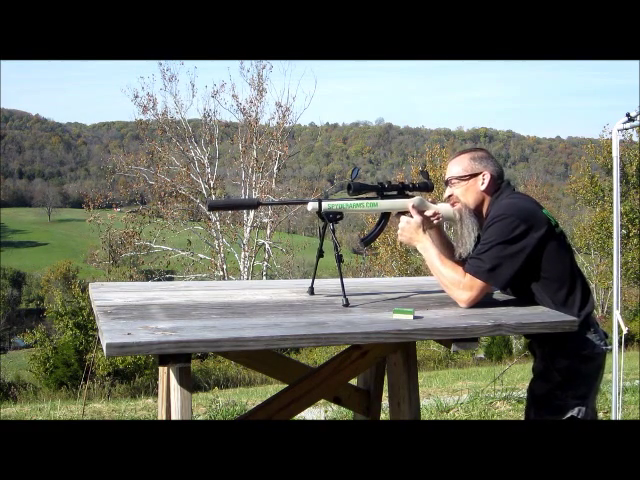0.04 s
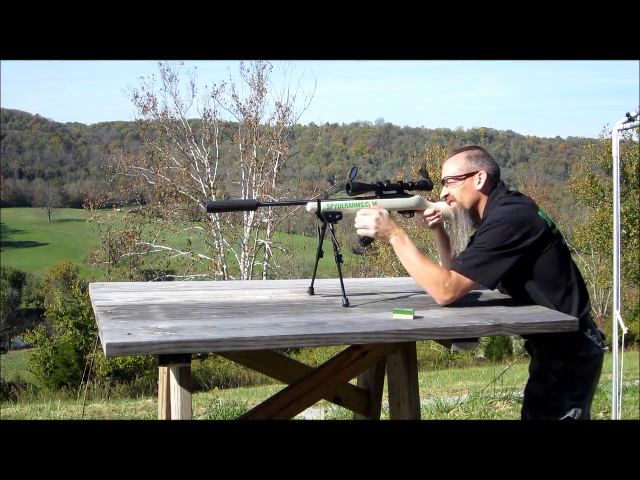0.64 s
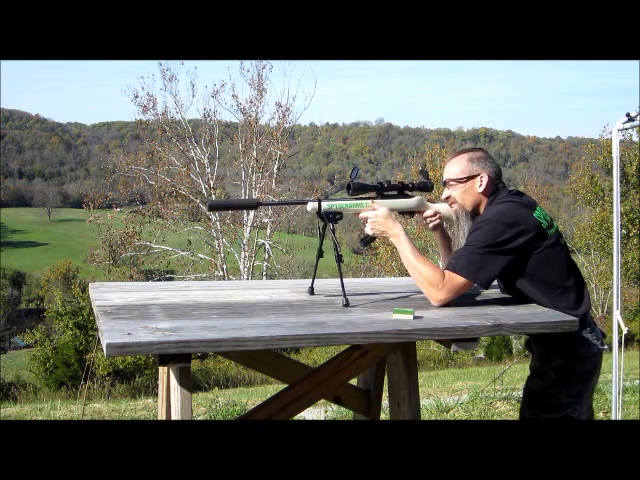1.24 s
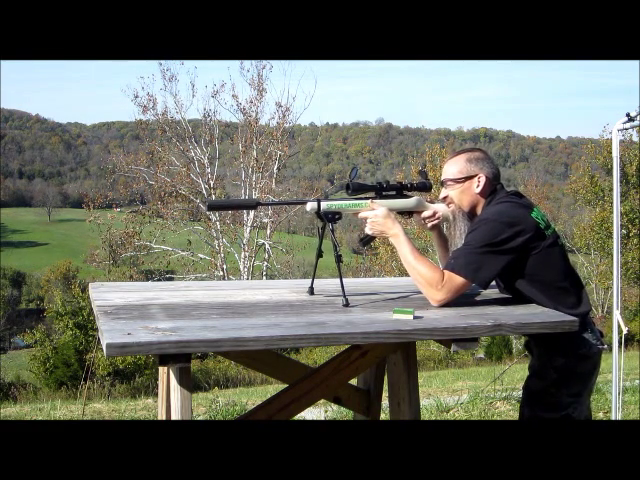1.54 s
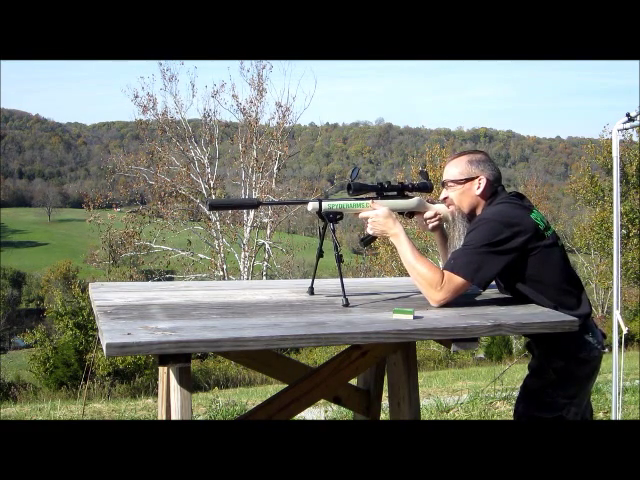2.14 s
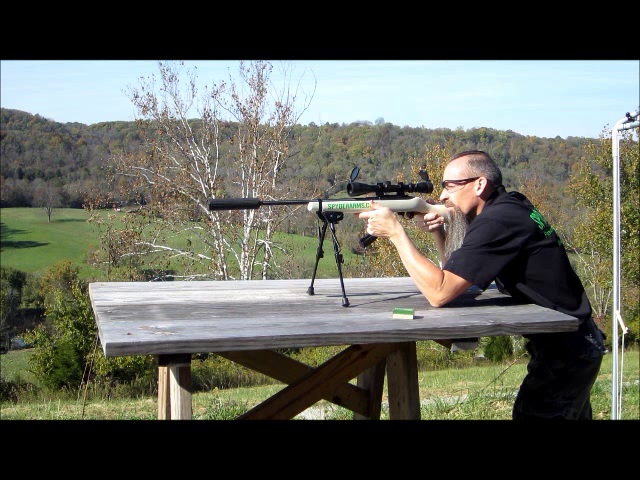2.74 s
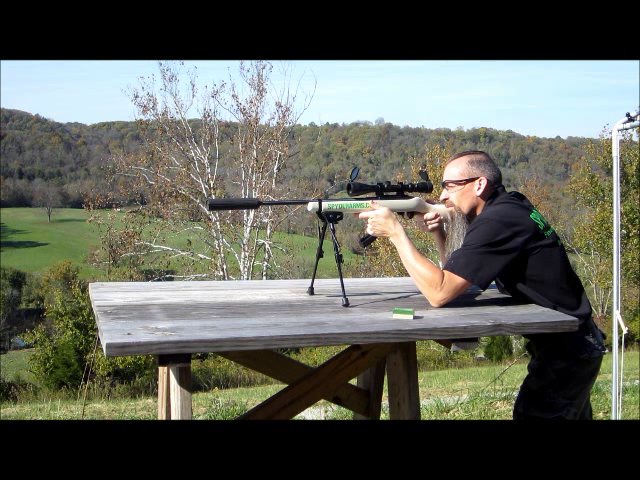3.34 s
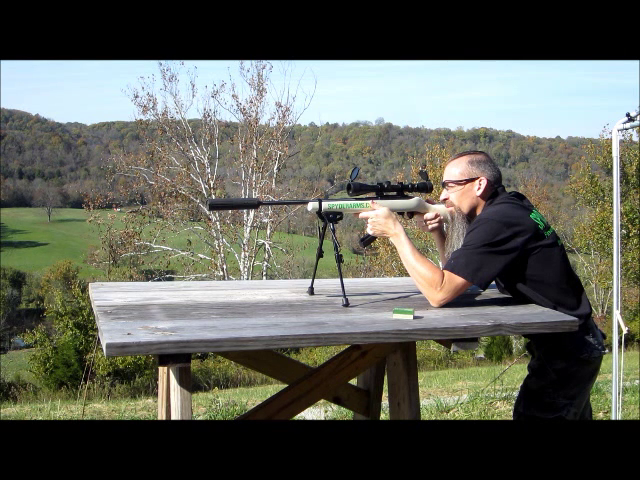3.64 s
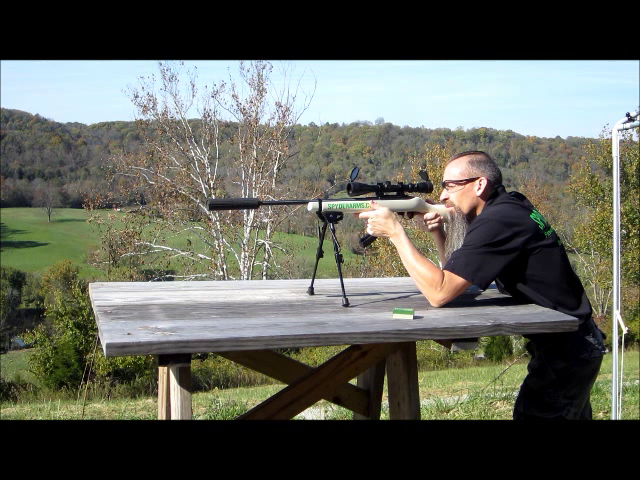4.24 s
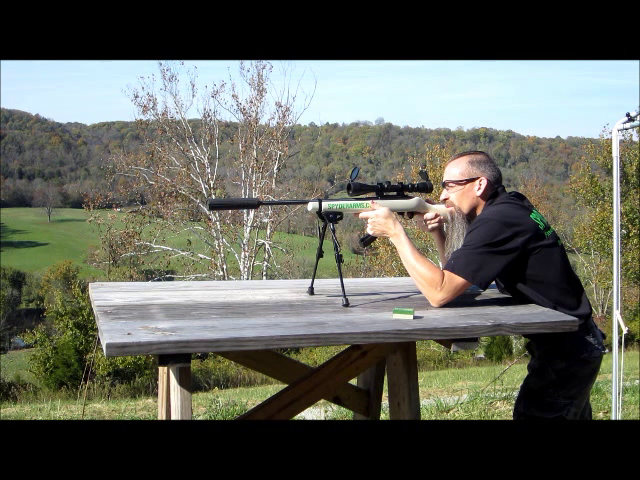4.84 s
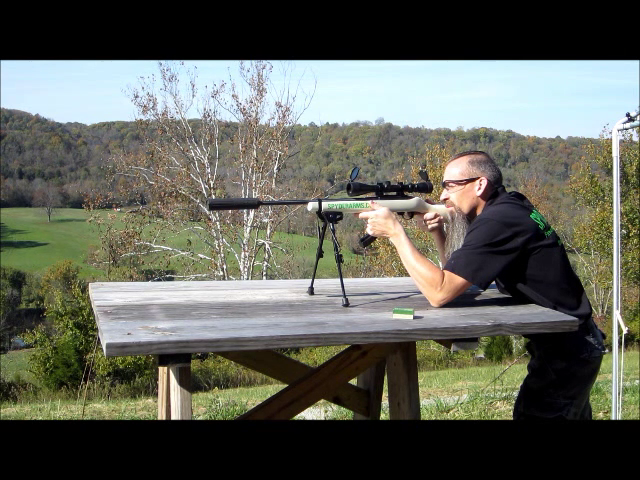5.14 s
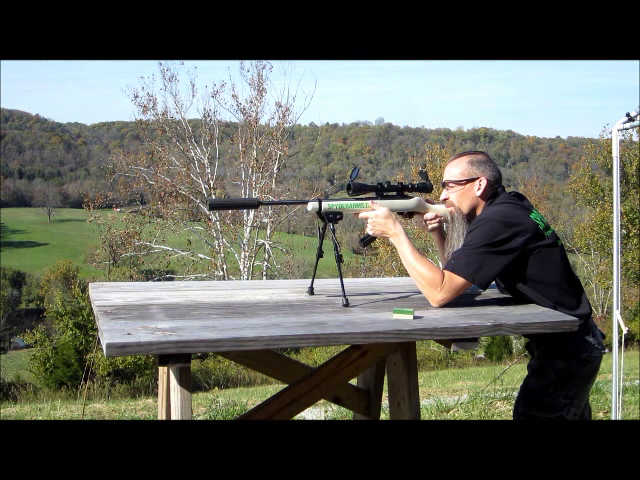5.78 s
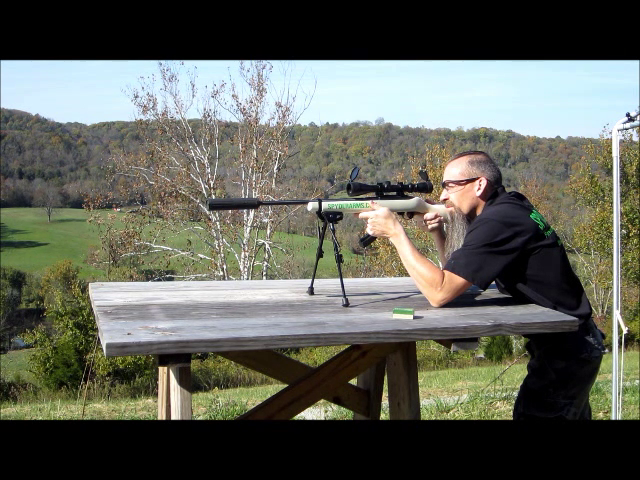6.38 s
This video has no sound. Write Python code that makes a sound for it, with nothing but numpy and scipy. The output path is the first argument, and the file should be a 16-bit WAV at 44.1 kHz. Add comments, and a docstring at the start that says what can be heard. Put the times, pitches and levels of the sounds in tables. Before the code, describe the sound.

In quiet open countryside, soft moving air and a faint distant engine hum lie under a small bird's high trill, short chirping calls and some farther whistles. After about five seconds a suppressed rifle fires once, close by: a sharp spit with a metallic bolt clack. Trees and hills echo it, the spent case tinkles, and a steel target pings faintly. The background dips after the shot, and the bird calls again.

```python
"""One shot from a suppressed semi-automatic .22 rifle on a wooden table, above a wooded valley.
First, over moving air, a distant engine and a camera's faint whine, a small bird trills and calls
while others whistle farther off. At 5.13 s the hammer falls, the muzzle spits gas and the bolt
cycles; the camera's gain control ducks everything. Then the trees and hills answer, the spent case
lands, the bullet rings a steel target, and the bird calls once more as the gain recovers."""
import sys
import numpy as np
from scipy import signal
from scipy.fft import rfft, irfft, next_fast_len
from scipy.io import wavfile
from scipy.ndimage import uniform_filter1d

SR = 44100
rng = np.random.default_rng(int(sys.argv[2]) if len(sys.argv) > 2 else 0)


def log_audio(samples):
    """Write samples as a 16-bit WAV file to the path given in sys.argv[1]."""
    # one column per channel
    frames = np.atleast_2d(samples).T
    # limit to full scale, then quantise
    limited = np.clip(frames, -1, 1)
    pcm = np.round(limited * 32767).astype(np.int16)
    wavfile.write(sys.argv[1], SR, pcm)


N = 287091
TIME = np.arange(N) / SR
SIZE = next_fast_len(N + SR, real=True)
HZ = np.fft.rfftfreq(SIZE, 1 / SR)


def from_db(db):
    """Amplitude ratio: tenfold for every 20 dB."""
    return 10 ** (np.asarray(db) / 20)

def unit(x):
    """Normalisation to rms 1."""
    return x / np.sqrt(np.mean(x ** 2) + 1e-20)

def add(mix, s, sound):
    """Superposition: a sound joins the mix at time s."""
    part = mix[max(round(s * SR), 0):][:len(sound)]
    part += sound[:len(part)]

def colour(points, hz, peaks=()):
    """Spectral envelope: a smooth gain with bell-shaped resonances and antiresonances."""
    f, db = np.transpose(points)
    smooth = np.interp(np.log(hz + 1), np.log(f), db)
    return from_db(smooth + sum(g * np.exp(-2 * ((hz - c) / w) ** 2) for c, w, g in peaks))

def noise(gain):
    """Stationary noise of rms 1: a given spectrum with random phases."""
    return unit(irfft(gain * np.exp(2j * np.pi * rng.random(len(HZ))), SIZE)[:N])

def drift(rate_hz):
    """Slow random modulation of rms 1."""
    knots = rng.standard_normal(2000)
    return unit(np.interp(TIME * 2 * rate_hz, np.arange(len(knots)), knots))

def fade(t, t60):
    """Exponential damping: 60 dB in t60 seconds."""
    return np.exp(-np.log(1000) * t / t60)

def burst(spectrum, t60, rise_s, size=8192):
    """Broadband transient: damped noise through a minimum-phase filter."""
    t, hz = np.arange(size) / SR, np.fft.rfftfreq(size, 1 / SR)
    shape = fade(t, t60) * (1 - np.exp(-t / rise_s))
    x = rng.standard_normal(size) * shape
    for _ in range(2):  # even out the spectrum, then restore the envelope
        x = irfft(np.exp(1j * np.angle(rfft(x))))
        x = x * shape / np.sqrt(abs(uniform_filter1d(x ** 2, size=40)) + 1e-14)
    log_gain = np.log(spectrum(hz) + 1e-6)
    mirrored = np.r_[log_gain, log_gain[-2:0:-1]]
    causal = np.exp(np.conj(signal.hilbert(mirrored)))[:len(hz)]
    return unit(irfft(rfft(x) * causal)) * np.sqrt(np.mean(shape ** 2))

def ring(modes, phase_spread=1):
    """Free vibration: a sum of damped normal modes."""
    t = np.arange(SR) / SR
    vibration = sum(from_db(db) * fade(t, t60) * np.sin(2 * np.pi * (hz * t + phase_spread * rng.random()))
                    for hz, db, t60 in modes)
    return vibration * np.minimum(t / .001, 1)

def scatter(x, t60, rise_s, tone=1):
    """Reverberation: convolution with dense reflections that build up and decay."""
    t = np.arange(SR) / SR
    taps = rng.standard_normal(SR) * fade(t, t60) * (1 - np.exp(-(t / rise_s) ** 2))
    return irfft(rfft(x, SIZE) * rfft(taps / np.linalg.norm(taps), SIZE) * tone, SIZE)[:N]


# spectrum of open air: (frequency [Hz], relative density [dB])
AIR_SPECTRUM = [(12, -30), (22, -8), (55, -2.5), (85, -3), (170, -9.5), (300, -12.5), (600, -16),
                (1000, -19.5), (1540, -20), (2210, -24), (4000, -27), (7000, -30), (11000, -33),
                (15500, -38.5)]

def air(db=-52.5, waver_db=.4):
    """Flow noise: moving air gives a broad, gently wavering spectrum."""
    return from_db(db + waver_db * drift(6)) * noise(colour(AIR_SPECTRUM, HZ))

def camera_whine(hz=7867, frame_hz=29.97, db=-71):
    """Phase resetting: an electronic tone restarts with every frame, so it buzzes slightly."""
    return from_db(db) * unit(np.sin(2 * np.pi * hz * (TIME % (1 / frame_hz))))

# envelope of the distant engine's hum: (time [s], relative level [dB])
ENGINE_LEVELS = [(0.7, -63.0), (1.2, -65.6), (1.8, -61.8), (2.3, -60.8), (2.9, -57.1), (3.5, -62.3),
                 (4.2, -62.6), (4.8, -58.5)]

def engine(hz=109, sag_hz_per_s=.4, flutter=.28, wander_rad=.8, idle_s=5.6, idle_db=-63, gain_db=.5):
    """Amplitude and phase modulation: a far engine's hum wanders as it slows very slightly."""
    s, db = np.transpose([*ENGINE_LEVELS, (idle_s, idle_db)])
    turns = np.cumsum(hz - sag_hz_per_s * TIME) / SR
    hum = unit((1 + flutter * drift(10)) * np.sin(2 * np.pi * turns + wander_rad * drift(6)))
    return from_db(np.interp(TIME, s, db) + gain_db) * hum


# whistles: (time [s], length [s], relative level [dB], start pitch [Hz], middle [Hz], end [Hz])
WHISTLES = [(.48, .08, -55.5, 1610, 1555, 1520), (1.17, .09, -63, 4300, 4650, 5000),
            (1.297, .032, -52.5, 1660, 1980, 2200), (1.306, .096, -53, 1250, 1550, 1350),
            (1.352, .085, -57.5, 2200, 1850, 1650), (2.5, .1, -65, 3600, 3700, 3680)]

def far_birds(gain_db=-1, hoarseness=.027):
    """Frequency modulation: slurred, slightly hoarse tones reverberate in the woods."""
    out = np.zeros(N)
    for s, length, db, *slur_hz in WHISTLES:
        u = np.linspace(0, 1, int(length * SR))
        glide = np.polyval(np.polyfit([0, .5, 1], slur_hz, 2), u)
        pitch = glide * (1 + hoarseness * drift(140)[:len(u)])
        tone = np.sin(2 * np.pi * np.cumsum(pitch) / SR)
        add(out, s, from_db(db + gain_db) * tone * np.sin(np.pi * u))
    return out + from_db(-3) * scatter(out, t60=1.0, rise_s=.012)

# the small bird's trills: (start [s], peak time [s], end [s], peak level [dB], first pitch [Hz])
TRILLS = [(.546, 1.12, 1.6, -45, 3920), (3.073, 3.1, 3.2, -58.5, 3770)]

def trills(step_s=.0605, lag_s=.0375, swell_db_per_s=8, fade_db_per_s=18.5, sag_hz_per_s=125):
    """Pulse trains that swell, fade and sag; yields (time [s], level [dB], pitch [Hz])."""
    for start, peak_s, end, peak_db, first_hz in TRILLS:
        k = np.arange((end - start) / step_s)
        times = start + k * step_s + lag_s * (1 - np.exp(-k / 1.2))  # hesitant, then steady
        for s in times[times < end]:
            weaker_db = max(swell_db_per_s * (peak_s - s), fade_db_per_s * (s - peak_s))
            yield s, peak_db - weaker_db, first_hz - sag_hz_per_s * (s - start)

# its three-note calls: (start [s], level [dB], time to the last note [s], pitch [Hz])
CALLS = [(2.885, -53, .097, 3910), (3.894, -50.5, .1, 3910), (6.148, -43, .11, 3945)]
# notes of a call: (share of that time [1], accent [dB], pitch step [Hz])
MOTIF = [(0, 0, 0), (.45, -2.5, 95), (1, 2, -25)]

def calls():
    """One motif, shifted and scaled; yields (time [s], level [dB], pitch [Hz])."""
    for start, db, length, hz in CALLS:
        for share, accent_db, step_hz in MOTIF:
            yield start + share * length, db + accent_db, hz + step_hz

def small_bird(chip_s=.029, crest=.618, sweep_hz=470, quaver=.013, voice_db=-48.3, aim=.65):
    """Directivity: a swept chip aimed away is faint, yet fills the woods with nearly the full voice."""
    direct, radiated = np.zeros((2, N))
    u = np.linspace(0, 1, int(chip_s * SR))
    swell = abs(np.sin(np.pi * u ** 1.18)) ** 1.22
    for s, db, top_hz in [*trills(), *calls()]:
        reach_hz = sweep_hz * np.exp(.3 * rng.standard_normal())
        arch_hz = top_hz - reach_hz * (u / crest - 1) ** 2
        hz = arch_hz * (1 + quaver * np.sin(2 * np.pi * (3 * u + rng.random())))
        chip = swell * np.sin(2 * np.pi * np.cumsum(hz) / SR)
        add(direct, s, from_db(db) * chip)
        add(radiated, s, from_db(db + aim * (voice_db - db)) * chip)
    woods = from_db(-5) * scatter(radiated, t60=.62, rise_s=.009)
    add(woods, .3, from_db(-15.5) * scatter(radiated, t60=.8, rise_s=.04))  # echo from the tree line
    return direct + woods


def echoes(arrivals, spectrum):
    """Incoherent summation: swells of noise add in power."""
    power = np.zeros(N)
    for s, db, rise_s in arrivals:
        u = np.maximum(TIME - s, 0) / rise_s
        power += (from_db(db) * u * np.exp(1 - u)) ** 2
    return np.sqrt(power) * noise(colour(spectrum, HZ))

# echoes from stands of trees and far hillsides: (arrival [s], peak level [dB], rise time [s])
TREE_ECHOES = [(5.472, -33.5, .026), (5.52, -52, .16), (5.648, -44.5, .015)]
HILL_ECHOES = [(5.48, -44, .115), (5.898, -45.5, .016), (5.8, -48.5, .2), (6.11, -47.5, .11)]
# their spectra: (frequency [Hz], relative density [dB])
TREE_SPECTRUM = [(100, -18), (400, -7), (1000, -4), (1700, 0), (2500, -2.5), (4200, -4.5), (5300, -15),
                 (8000, -24), (12000, -35), (15500, -40)]
HILL_SPECTRUM = [(60, -22), (170, -11), (290, -0.5), (400, -2.5), (500, -1), (700, 0), (950, -6),
                 (1300, -21), (2500, -28), (5000, -60)]

def valley(lumpy_db=1.6):
    """Scattering: the report returns from countless trees in lumps; air absorbs the far treble."""
    lumps = from_db(lumpy_db * drift(50))
    return lumps * (echoes(TREE_ECHOES, TREE_SPECTRUM) + echoes(HILL_ECHOES, HILL_SPECTRUM))


# knocks around bench and target: (time [s], level [dB], t60 [s], centre [Hz], width [octaves])
KNOCKS = [(.308, -53.5, .12, 7000, .8), (.443, -61, .1, 11000, .5), (.494, -57, .12, 11500, .4),
          (1.6, -57, .12, 5000, 1.2), (1.655, -56, .16, 6000, 1.2), (5.4711, -21, .018, 300, .9),
          (5.4711, -20, .022, 1900, .45), (5.4765, -25.5, .06, 3400, .4), (5.4868, -20.5, .018, 5600, .4),
          (5.519, -24.5, .02, 1600, .35), (6.1612, -40, .018, 8000, 1.2), (6.169, -40.5, .039, 2000, 1.14)]

def knocks():
    """Heavy damping: scuffs and thuds give brief bands of noise."""
    out = np.zeros(N)
    for s, db, t60, centre_hz, octaves in KNOCKS:
        band = lambda hz: 1 / (1 + (np.log2((hz + 1) / centre_hz) / octaves) ** 2)
        add(out, s, from_db(db) * burst(band, t60, rise_s=.018 * t60))
    return out

# bounces of the brass case: (time [s], gain [dB])
CASE_BOUNCES = [(5.4875, -4), (5.4995, -2)]
# its modes: (frequency [Hz], relative level [dB], t60 [s])
CASE_MODES = [(12610, -43, .09), (12700, -42, .1), (13400, -58, .2)]

def spent_case():
    """Impact excitation: each bounce rings the small shell's high modes."""
    out = np.zeros(N)
    for s, db in CASE_BOUNCES:
        add(out, s, from_db(db) * ring(CASE_MODES))
    return out

# modes of the steel target: (frequency [Hz], relative level [dB], t60 [s])
TARGET_MODES = [(3165, -51, .4), (3607, -51, .4), (3935, -38, .6), (3950, -42, .6), (4480, -45, .2),
                (5136, -52.5, .9), (6072, -55, .5), (6891, -53, .6), (8193, -49, .38), (8985, -56, .5),
                (10220, -59, .4)]

def target(hit_s=5.514, gain_db=-2):
    """Beating: the bullet starts all modes in phase, and close pairs interfere."""
    out = np.zeros(N)
    add(out, hit_s, from_db(gain_db) * ring(TARGET_MODES, phase_spread=0))
    return out


# modes of the trigger: (frequency [Hz], level [dB], t60 [s])
TRIGGER_MODES = [(2562, -37, .04), (4081, -25.5, .02), (6864, -32, .025)]

def trigger(reset_s=5.39):
    """Free vibration: the trigger resets with a small ping."""
    out = np.zeros(N)
    add(out, reset_s, ring(TRIGGER_MODES))
    return out

# modes of barrel and action: (frequency [Hz], relative level [dB], t60 [s])
STEEL_MODES = [(2394, -30.5, 0.096), (2590, -33, .1), (3160, -33, .08), (4100, -35, .06), (4895, -33, 0.12),
               (5450, -26, .08), (6087, -33, .08), (6840, -34, .06), (8525, -30, .05), (9745, -30, .045),
               (10090, -37, .06)]

def steel(db):
    """Modal response: the rifle's steel rings after a blow."""
    return from_db(db) * ring(STEEL_MODES)

# blows in the action: (time [s], relative level [dB], t60 [s], tilt [dB/octave], chatter length [s])
BLOWS = [(5.1288, -9, .012, 1, 0), (5.13, 10, .0091, 3, 0), (5.1306, 11, .012, 2, 0),
         (5.1493, -1, .014, -2, 0), (5.1528, 4, .015, -1.5, .017), (5.1743, 14.3, .014, 0, 0),
         (5.185, -13, .008, -.5, 0), (5.1954, 0, .015, -2, .012), (5.3898, -26, .02, 0, 0)]

def blows(rebound_s=.0048, rebound_db=-11, rebound_tilt_db=-1.2):
    """Inelastic rebound: loose parts chatter after a blow, weaker and duller."""
    for s, db, t60, tilt_db, chatter_s in BLOWS:
        yield s, db, t60, tilt_db
        for delay in np.arange(rebound_s, chatter_s, rebound_s):
            yield s + delay, db + rebound_db, t60, tilt_db + rebound_tilt_db

# spectrum of a blow: (frequency [Hz], relative density [dB])
BLOW_SPECTRUM = [(60, -36), (150, -26), (400, -26), (750, -21.5), (1090, -13), (1500, -17), (2200, -6),
                 (4400, -6.5), (6200, -4), (8000, -9), (10600, -11), (13900, -19), (15500, -29)]
# resonances and hollows of the receiver: (frequency [Hz], width [Hz], gain [dB])
RECEIVER = [(2480, 160, -4), (3150, 450, 6), (4000, 340, 3), (4500, 240, -5), (6130, 350, 4.5),
            (6800, 300, 4), (8300, 260, -5), (9150, 260, -4), (10400, 500, 4)]

def action():
    """Impact noise: hammer and bolt strike, exciting the receiver and the steel."""
    out = np.zeros(N)
    for s, db, t60, tilt_db in blows():
        tilt = lambda hz: from_db(tilt_db * np.log2(1 + hz / 1000))
        spectrum = lambda hz: colour(BLOW_SPECTRUM, hz, RECEIVER) * tilt(hz)
        add(out, s, from_db(db) * burst(spectrum, t60, rise_s=.0002))
        add(out, s, steel(db - 4.5))
    return out

# spectrum of the gas jet: (frequency [Hz], relative density [dB])
JET_SPECTRUM = [(60, -35), (150, -32), (330, -29), (560, -12.5), (900, -15), (1400, -10), (2200, -8),
                (4400, -9), (5500, -4), (7500, -6.5), (11000, -6), (13500, -14), (15500, -20)]
# resonances and hollows of the suppressor: (frequency [Hz], width [Hz], gain [dB])
SUPPRESSOR = [(1760, 120, -8), (2980, 170, -7), (5500, 400, 5), (5950, 270, 3), (6370, 260, -6),
              (6860, 450, 5.5), (7200, 170, -6), (8080, 260, -6), (8540, 260, 5.5), (9250, 450, -7.5),
              (9810, 330, 6)]

def muzzle(shot_s=5.1349, jet_db=28.5, bleed_db=-3, steel_db=20):
    """Source and filter: a gas jet, then the gas that bleeds out, sounds through the suppressor."""
    out = np.zeros(N)
    spectrum = lambda hz: colour(JET_SPECTRUM, hz, SUPPRESSOR)
    add(out, shot_s, from_db(jet_db) * burst(spectrum, t60=.0164, rise_s=.0013))
    add(out, shot_s, from_db(bleed_db) * burst(spectrum, t60=.08, rise_s=.002))
    add(out, shot_s, steel(steel_db))
    return out

# reflection from nearby ground and bushes, and from the sloping field: (frequency [Hz], gain [dB])
NEAR_RESPONSE = [(100, 7), (400, -1), (1500, 2), (4000, -1), (7000, -3), (11000, -2), (15500, -3)]
FIELD_RESPONSE = [(100, 2), (400, -1), (1500, 0), (5000, -2), (6600, -14), (11000, -19), (15500, -26)]

def rifle():
    """Direct and diffuse sound: the shot, followed by reflections from its surroundings."""
    direct = muzzle() + action() + trigger()
    near = from_db(-26) * scatter(direct, t60=.19, rise_s=.006, tone=colour(NEAR_RESPONSE, HZ))
    field = from_db(-37) * scatter(direct, t60=.9, rise_s=.03, tone=colour(FIELD_RESPONSE, HZ))
    return direct + near + field


def scene():
    """Superposition: all sources add at a single microphone."""
    shooting = rifle() + knocks() + target() + spent_case() + valley()
    return (shooting + small_bird() + far_birds() + air() + engine() + camera_whine())[None]

def record(dry, threshold_db=-23, depth_db=23.5, recovery_db_per_s=14, start_db=10.0, settle_s=.43):
    """Automatic gain control: the gain dives at the shot and creeps back; clipping and low-pass follow."""
    power_db = 10 * np.log10(abs(uniform_filter1d(dry[0] ** 2, size=128)) + 1e-12)
    excess_db = np.clip(2 * (power_db - threshold_db), 0, depth_db)
    recovery_db = recovery_db_per_s * TIME
    held_db = np.maximum.accumulate(excess_db + recovery_db) - recovery_db
    waking_db = start_db * np.exp(-TIME / settle_s)  # the gain starts low and rises
    ducked = dry * from_db(-uniform_filter1d(np.maximum(held_db, waking_db), size=32))
    lowpass = signal.firwin(511, cutoff=15750, window=("kaiser", 9), fs=SR)
    return signal.oaconvolve(np.clip(ducked, -1, 1), lowpass[None], "same")


dry = scene()
out = record(dry)
log_audio(out)
```